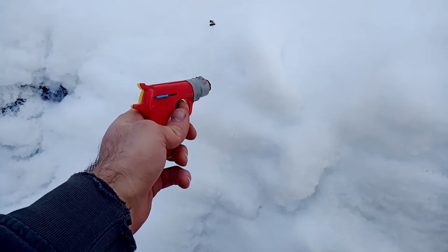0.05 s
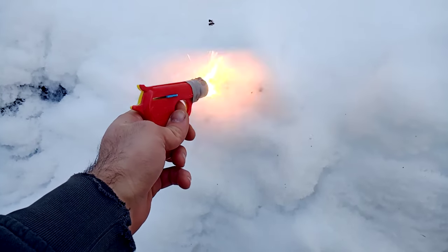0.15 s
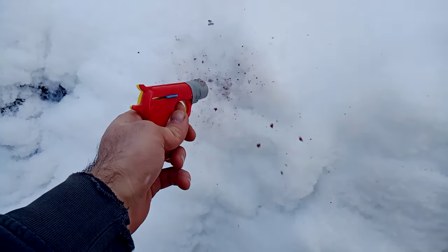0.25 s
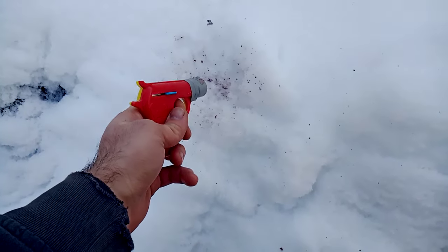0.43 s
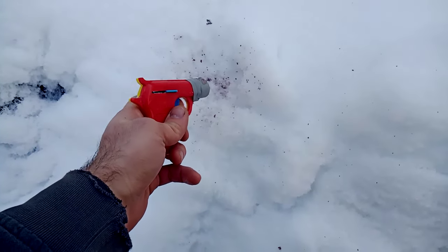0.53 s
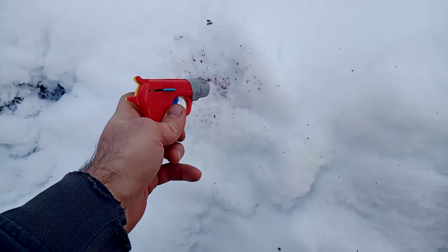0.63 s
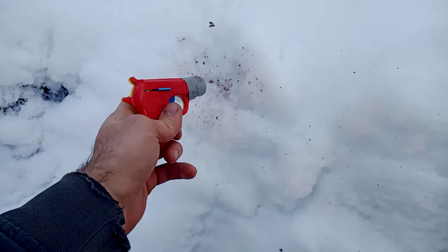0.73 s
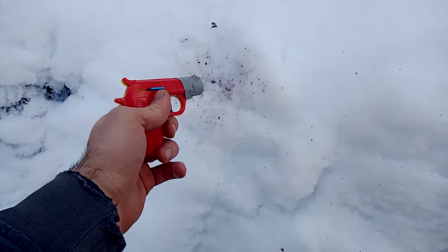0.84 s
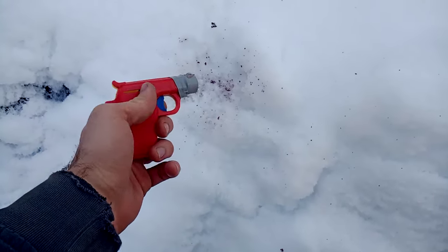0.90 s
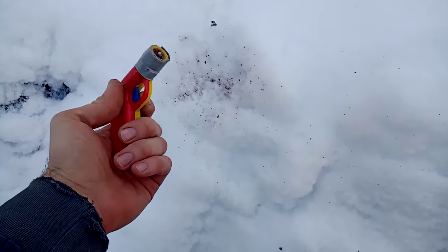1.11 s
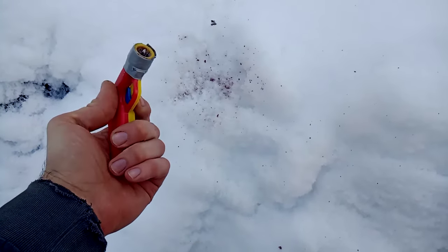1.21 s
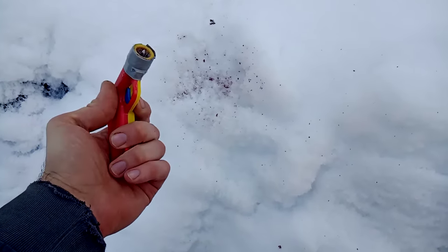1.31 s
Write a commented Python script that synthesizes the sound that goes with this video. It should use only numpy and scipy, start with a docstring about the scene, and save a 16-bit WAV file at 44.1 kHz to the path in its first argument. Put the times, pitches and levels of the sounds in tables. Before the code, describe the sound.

One sharp, slightly distorted bang comes from a plastic cap gun close to the microphone, outdoors over snow. A short echo rolls off, the trigger clicks back, and the toy ticks and rubs faintly in the hand.

```python
"""In very quiet winter air, a plastic toy cap pistol ticks and rubs in the hand.
At 0.2 s it fires once over snow, an arm's length from the microphone: gas bursts from the muzzle,
the barrel rings and the crack overloads the recorder. The sound snaps back from nearby surfaces,
then rolls away among farther ones. As it fades there is a faint tick like grit landing,
the released trigger scrapes and clicks home, and the plastic ticks and rubs again."""
import sys
import numpy as np
from scipy import signal
from scipy.fft import rfft, irfft
from scipy.io import wavfile
from scipy.ndimage import uniform_filter1d

SR = 44100
rng = np.random.default_rng(int(sys.argv[2]) if len(sys.argv) > 2 else 0)


def int16_out(signal):
    """Quantize to a 16-bit WAV file."""
    q = np.round(np.clip(np.atleast_2d(signal).T, -1, 1) * 32767)
    wavfile.write(sys.argv[1], SR, q.astype(np.int16))


N = 59535
TIME = np.arange(N) / SR
HZ = np.maximum(np.arange(N // 2 + 1) * SR / N, 1)
SHOT_S = .2058


def blast():
    """A pressure front leaves the muzzle, gas follows it, and the barrel rings."""
    # tone of the gas (frequency [Hz], relative level [dB])
    gas_tone = [(40, -13), (150, -4.5), (570, -8.5), (1500, -6), (2300, -2), (3300, -2.5), (5400, -6.5),
                (6700, -4), (7600, -8.5), (8300, -19), (12800, -30), (15000, -19)]
    # the puff of air that thumps the microphone (pitch [Hz], level [dB], fade time [s])
    puff = [(112, -17.5, .06)]
    # ringing of barrel and shell (pitch [Hz], level [dB], fade time [s])
    barrel = [(279, -9, .04), (700, -22, .03), (1102, -17, .045), (1592, -16.5, 0.03), (1760, -17, 0.038),
              (2010, -16.5, .04), (2265, -13, .04), (2615, -14.5, .04), (3217, -12.5, 0.023),
              (4060, -17, 0.032), (4485, -17, 0.047), (5120, -18, 0.021), (5900, -18.5, .035),
              (6787, -16.5, .05)]
    front_s, age = .0005, TIME - SHOT_S
    front = (age >= 0) * (age < front_s) * (1 - 2 * age / front_s)   # a push, then a pull: an N shape
    gas = noise(gas_tone) * decay(SHOT_S, fade_s=.028, hold_s=.0062)
    return from_db(-2.5) * front + from_db(-8.5) * gas + gas_jet() + ring(puff) - ring(barrel)


def gas_jet():
    """The jet of gas leaves as a low bark, then a thin screech."""
    # bursts of the jet (start [s], level [dB], pitch [Hz], width [Hz], hold [s], fade time [s])
    bursts = [(0.207, -7.5, 2784, 1497, .002, .006), (.2112, -12, 6607, 450, .002, .018)]
    jet = np.zeros(N)
    for start, db, hz, width, hold_s, fade_s in bursts:
        hiss = rms_one(resonate_twice(rng.standard_normal(N), hz, width))
        jet += from_db(db) * hiss * decay(start, fade_s, hold_s)
    return jet


def ring(tones):
    """The shot sets off pure tones that die away; every other one starts upside down."""
    age = TIME - SHOT_S
    return sum((-1) ** k * from_db(db) * np.sin(2 * np.pi * hz * age) * decay(SHOT_S, fade_s)
               for k, (hz, db, fade_s) in enumerate(tones))


def echoes():
    """Sharp slaps and swells of scattered echoes, duller the farther they travel through the air."""
    # single echoes from nearby surfaces (time [s], level [dB])
    near_echoes = [(0.2192, -15), (0.222, -19.5), (0.2234, -9), (0.2299, -21), (0.2385, -26), (0.251, -20),
                   (0.2525, -20), (0.2596, -13), (.2748, -17), (.283, -14.5)]
    # their tone (frequency [Hz], relative level [dB])
    slap_tone = [(40, -31.5), (200, -12), (900, -11.5), (2400, -1), (4200, -3.5), (6500, 0.5), (7600, -6),
                 (8400, -17.5), (12000, -27), (15200, -15)]
    # groups of echoes from farther off (peak time [s], level [dB], rise [s], fade time [s])
    groups = [(.257, -24.5, .008, 0.11), (.303, -27.5, .04, 0.39), (.345, -22, 0.027, 0.26)]
    # their tone (frequency [Hz], relative level [dB])
    scatter_tone = [(35, -35.5), (90, -11.5), (280, -9), (400, -10), (900, -10), (1500, -5.5), (2400, 0.5),
                    (4200, -8), (6600, -2), (7600, -11), (8400, -18), (12000, -31.5), (15200, -22.5)]
    slaps = noise(slap_tone) * sum(from_db(db) * decay(start, fade_s=.01) for start, db in near_echoes)
    scatter = noise(scatter_tone, grain_db=3) * swells(groups) * (TIME > SHOT_S)
    air_loss_db = 43 * np.maximum(TIME - SHOT_S, 0)   # at 8 kHz; higher sounds lose more
    return sum(band * from_db(-air_loss_db * hz / 8000) for hz, band in bands(slaps + scatter))


def dying_roll():
    """Echoes blur into a roll that lasts longest in the middle range, where a few pitches linger."""
    # tone of the roll (frequency [Hz], relative level [dB])
    roll_tone = [(40, -28), (100, -7), (300, -2), (450, -9), (800, -4.5), (1700, -1.5), (2700, 0.5),
                 (4500, -3.5), (7000, -6), (9000, -20), (15000, -32)]
    # how long it lasts (frequency [Hz], fade time [s])
    fades = [(80, .4), (160, .42), (300, 0.8), (900, 0.53), (1900, .75), (4000, .58), (7000, .55),
             (14000, .42)]
    # lingering pitches (pitch [Hz], width [Hz], relative level [dB])
    pitches = [(1490, 80, -2.5), (1786, 110, 0), (2380, 180, 0)]
    roll = sum(band * decay(SHOT_S, at_hz(fades, hz)) for hz, band in bands(noise(roll_tone)))
    hiss = rng.standard_normal(N)
    linger = rms_one(sum(from_db(db) * resonate_twice(hiss, hz, width) for hz, width, db in pitches))
    return from_db(-30) * roll + from_db(-47.5) * linger * decay(SHOT_S, fade_s=1.3)


def far_echo():
    """A distant wash of sound returns about a third of a second after the shot."""
    # the farthest echoes (peak time [s], level [dB], rise [s], fade time [s])
    groups = [(.492, -47, 0.031, 0.39), (.62, -62, 0.037, .3)]
    # their tone, with little bass or treble (frequency [Hz], relative level [dB])
    tone = [(100, -30), (900, -10), (1600, -2.5), (3000, 0.5), (5400, -6.5), (7400, -13), (9200, -47)]
    return noise(tone) * swells(groups)


def grit_and_trigger():
    """A faint tick like grit landing, then the trigger's scrape and click."""
    # faint tick, trigger scrape, trigger click (peak time [s], level [dB], rise [s], fade time [s])
    events = [(.539, -57, .002, .03), (.5685, -46, .0025, .08), (.5822, -40, .0005, .012)]
    # their tone (frequency [Hz], relative level [dB])
    tone = [(100, -30), (700, -18), (1200, -8), (2300, -9), (2950, 0), (3800, -8), (5500, 0), (7500, -10),
            (9000, -19), (14000, -36)]
    return noise(tone) * swells(events)


def ticks():
    """Trigger and shell tick in the hand; a softer contact has less treble."""
    # contacts (time [s], relative level [dB], fade time [s], treble limit [Hz])
    contacts = [(.0362, -41, 0.02, 6100), (.1142, -52, .02, 15800), (.1342, -40, .009, 13000),
                (.183, -47, .02, 15800), (.815, -34, 0.014, 9000), (0.822, -50, .035, 9000),
                (.9175, -37, 0.0083, 6500), (1.01, -54, 0.017, 15200), (1.083, -49, 0.016, 16000),
                (1.162, -52, .03, 7000), (1.27, -56, 0.013, 7010)]
    ringing = plastic(rng.standard_normal(N))
    sound = np.zeros(N)
    for start, db, fade_s, top_hz in contacts:
        soften = signal.butter(2, top_hz, fs=SR, output="sos")
        sound += signal.sosfilt(soften, ringing * from_db(db) * decay(start, fade_s) + 1e-18)
    return sound / 2


def rubbing():
    """Skin sticks and slips on the plastic grip, so the rubbing flickers."""
    # rubs of the hand (peak time [s], level [dB], rise [s], fade time [s])
    rubs = [(.003, -50, .01, .17), (.042, -47, .005, 0.089), (.072, -57, .012, .3), (.137, -55, .015, .2),
            (.72, -71, 0.054, 0.93), (.92, -68, 0.0055, .12), (1.112, -62.5, 0.02, 0.32),
            (1.277, -63, 0.0059, 0.37)]
    # dull tone of skin and sleeve (frequency [Hz], relative level [dB])
    skin_tone = [(30, -16), (70, -1), (130, 2), (300, -2), (700, -7), (2000, -5), (3500, -9), (6000, -22),
                 (12000, -40)]
    flicker_db, flicker_s = 1.2, .005
    flicker = rms_one(uniform_filter1d(rng.standard_normal(N), int(flicker_s * SR)))
    slips = rng.standard_normal(N) * from_db(flicker_db * flicker)
    return (plastic(slips) + from_db(-15) * noise(skin_tone)) * swells(rubs)


def plastic(force):
    """Bright ringing of the plastic when it is tapped or rubbed, as coloured by the microphone."""
    # peaks in the tone of plastic and microphone (pitch [Hz], width [Hz], relative level [dB])
    peaks = [(2900, 700, -17), (4330, 450, -13), (5800, 450, 0), (6630, 400, 0), (7350, 350, -1),
             (15280, 900, -14)]
    ringing = sum((-1) ** k * from_db(db) * resonate(force, hz, width)
                  for k, (hz, width, db) in enumerate(peaks))
    microphone_dip = (from_db(-10) - 1) * resonate(ringing, hz=13000, width=6500)
    return rms_one(ringing + microphone_dip)


def winter_air():
    """Still air makes a faint, steady hush."""
    # tone of the hush (frequency [Hz], relative level [dB])
    tone = [(30, -20.5), (75, -4.5), (300, -2), (600, -5), (1100, -4), (1600, 0.5), (2200, -11.5),
            (4200, -17), (6500, -6), (8500, -20), (13000, -26), (15500, -18.5)]
    return from_db(-73) * noise(tone)


def from_db(db):
    """Turn decibels into a multiplier."""
    return 10 ** (np.asarray(db) / 20)


def rms_one(x):
    """Scale a sound so that its average strength (rms) is one."""
    return x / np.sqrt(np.mean(x ** 2) + 1e-20)


def at_hz(points, hz):
    """Read between the rows of a table, with octaves evenly spaced."""
    frequencies, values = np.transpose(points)
    return np.interp(np.log(hz), np.log(frequencies), values)


def noise(tone, grain_db=0):
    """Noise of strength one with the given tone; more grain makes it rougher."""
    hiss = rng.standard_normal(N) * from_db(grain_db * rng.standard_normal(N))
    return rms_one(irfft(rfft(hiss) * from_db(at_hz(tone, HZ)), N))


def decay(start, fade_s, hold_s=0):
    """Start suddenly, hold, then fade. The fade time is how long a drop of 60 dB takes."""
    return (TIME >= start) * np.exp(-np.log(1000) * np.maximum(TIME - start - hold_s, 0) / fade_s)


def swells(rows):
    """Loudness curve of overlapping swells, each rising smoothly to a peak and fading."""
    power = np.zeros(N)
    for peak_s, db, rise_s, fade_s in rows:
        rise = np.exp(-.5 * ((TIME - peak_s) / rise_s) ** 2)
        power += (from_db(db) * np.where(TIME < peak_s, rise, decay(peak_s, fade_s))) ** 2
    return np.sqrt(power)


def bands(x):
    """Split a sound into overlapping half-octave slices: (centre [Hz], sound)."""
    centres, spectrum = np.geomspace(40, 16000, 18), rfft(x)
    return [(hz, irfft(spectrum * np.interp(np.log(HZ), np.log(centres), share), N))
            for hz, share in zip(centres, np.eye(len(centres)))]


def resonate(x, hz, width):
    """Keep the part of a sound near one pitch."""
    return signal.lfilter(*signal.iirpeak(hz, hz / width, fs=SR), x + 1e-18)


def resonate_twice(x, hz, width):
    """Two passes make the pitch stand out more clearly."""
    return resonate(resonate(x, hz, width), hz, width)


def scene():
    """The shot, its echoes, the hand and the air, in one channel."""
    return (blast() + echoes() + grit_and_trigger() + far_echo() + dying_roll()
            + ticks() + rubbing() + winter_air())[None]


def record(dry):
    """The blast overloads the recorder, which squashes the peaks and cuts the highest treble."""
    ceiling, cutoff_hz = .65, 16500
    squashed = dry / (1 + (dry / ceiling) ** 4) ** .25
    return signal.sosfilt(signal.cheby2(16, 60, cutoff_hz, fs=SR, output="sos"), squashed)


dry = scene()
out = record(dry)
int16_out(out)
```